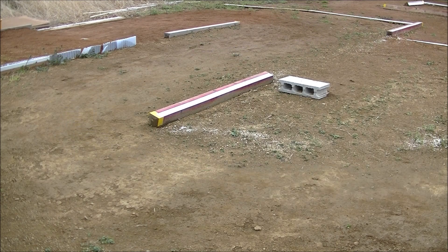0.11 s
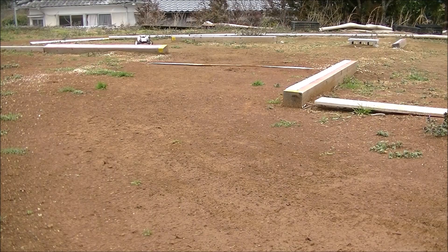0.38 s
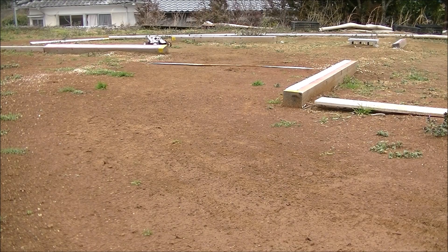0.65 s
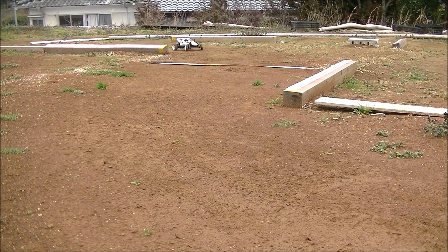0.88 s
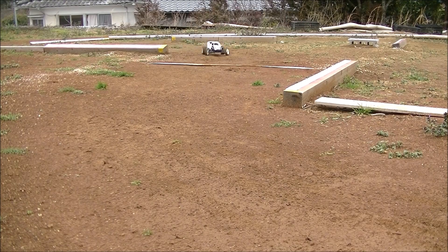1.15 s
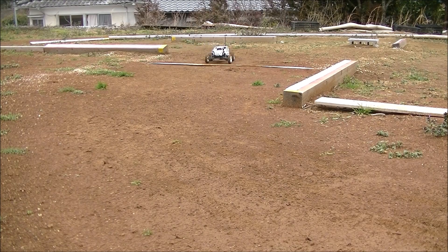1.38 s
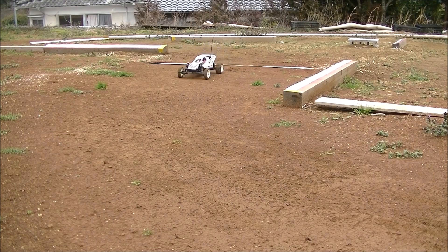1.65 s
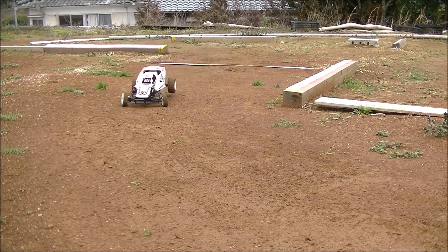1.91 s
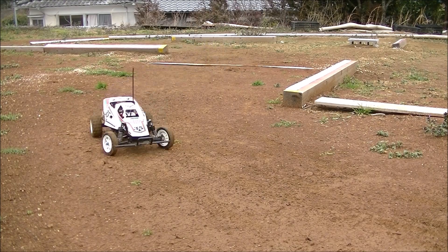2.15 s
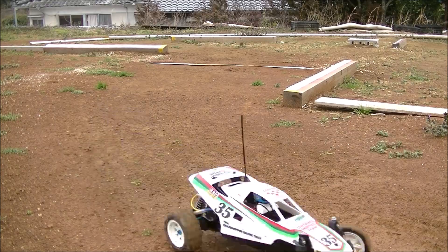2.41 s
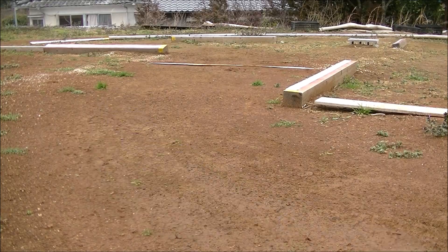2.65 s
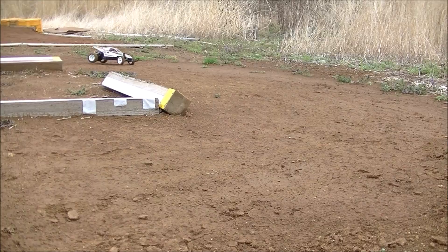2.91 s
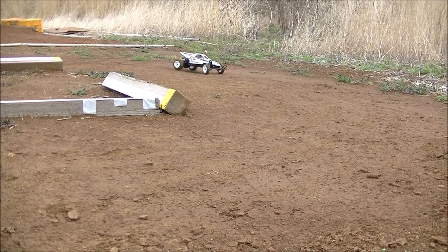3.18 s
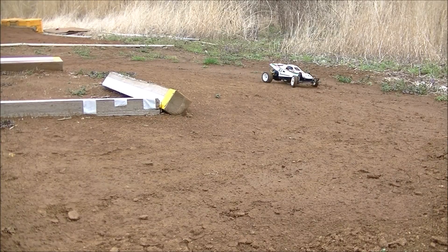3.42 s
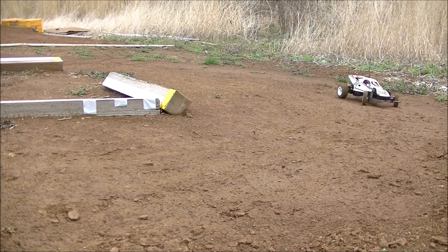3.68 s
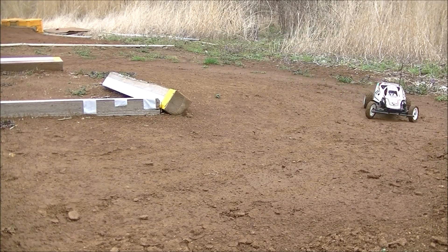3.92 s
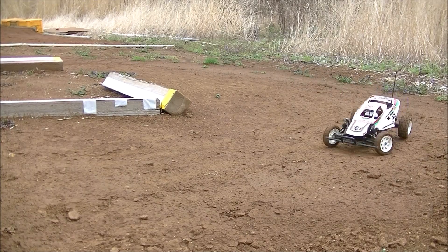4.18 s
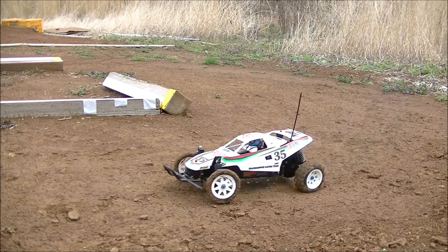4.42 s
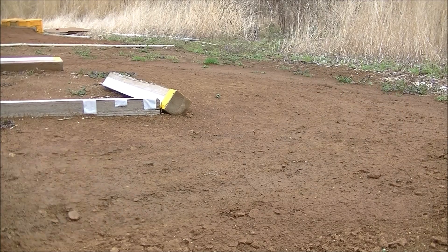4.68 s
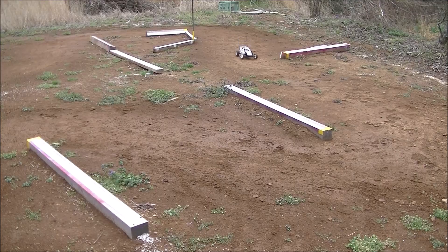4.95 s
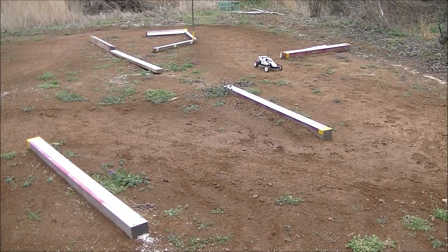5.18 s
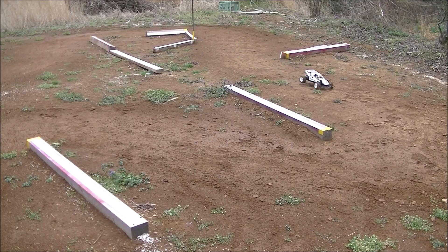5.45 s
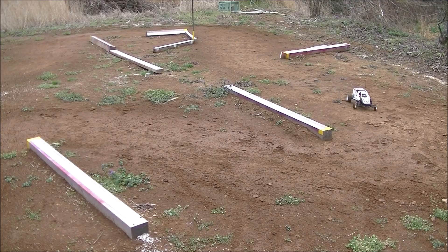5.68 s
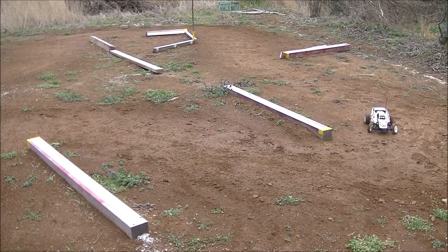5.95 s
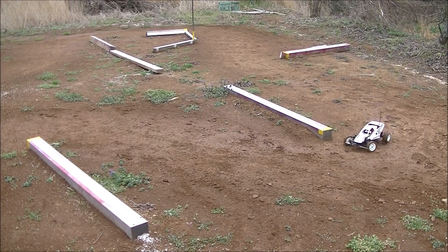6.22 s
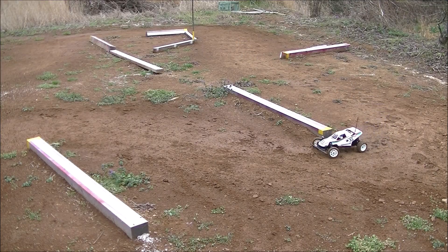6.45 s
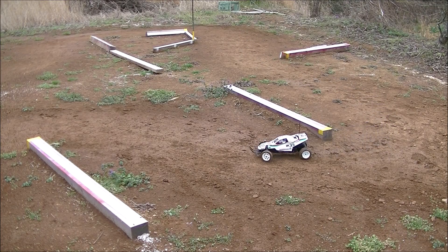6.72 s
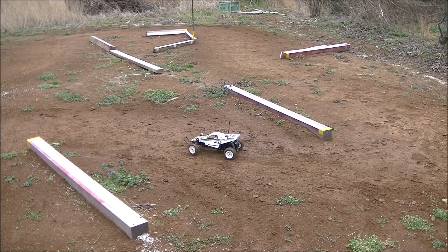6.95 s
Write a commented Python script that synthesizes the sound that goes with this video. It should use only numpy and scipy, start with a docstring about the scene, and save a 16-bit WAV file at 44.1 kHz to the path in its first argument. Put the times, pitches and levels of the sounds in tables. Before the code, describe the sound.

Four hard-cut passes of a toy-sized electric buggy outdoors: raspy gear whine climbing and dropping, grainy tyre scrabble, plastic chassis thuds and ticking stones.

```python
"""On an outdoor dirt track a small electric buggy hops past in four passes joined by hard cuts.
Its gears whine in glides, mostly climbing and then falling quickly: a tooth tone with overtones,
shaped by the gearbox. Tyres scrabble as grainy noise in bands, the plastic chassis thuds and
rattles as struck modes, grit ticks as short ringing snaps, and a few brief tones squeak.
Filtered noise makes a faint rumble, air and two gusts of wind; a sine makes a far drone."""
import sys
import numpy as np
from scipy import signal
from scipy.io import wavfile
from scipy.ndimage import uniform_filter1d

SR = 44100
rng = np.random.default_rng(int(sys.argv[2]) if len(sys.argv) > 2 else 0)


def dump_mix(stems):
    """Bounce the given channels to the path in sys.argv[1] as a 16-bit WAV at rate SR."""
    frames = np.atleast_2d(stems).T  # one column per channel
    limited = np.clip(frames, -1, 1)  # hard clip at full scale
    pcm = np.round(limited * 32767).astype(np.int16)
    wavfile.write(sys.argv[1], SR, pcm)


def gain_from_db(level_db):
    """Convert decibel levels to linear amplitude factors (20 dB per decade)."""
    decades = np.asarray(level_db, float) / 20
    return 10 ** decades


N = 312669

# the four passes: (start [s], end [s])
PASS_SPANS = [(0, .211), (.211, 2.748), (2.748, 4.816), (4.865, 7.1)]
# modes of the plastic chassis: (frequency [Hz], width [Hz], level [dB])
CHASSIS_MODES = [(410, 82, -4.5), (471, 52, -8.5), (685, 144, -4.5), (1125, 270, 6), (1427, 260, 4),
                 (1830, 170, -0.5), (3120, 510, -0.5)]
# resonances of the outer shell: (frequency [Hz], width [Hz], gain [dB])
SHELL_RESONANCES = [(1114, 162, 2), (1670, 170, 1.5), (3430, 210, 3.5), (9140, 1660, 3.5)]


def rms_one(x):
    """Normalisation: scales a signal to unit root mean square."""
    return x / np.sqrt(np.mean(x ** 2) + 1e-20)


def in_time(rows):
    """Linear interpolation: the columns of a table, after its time column, at every sample."""
    s, *columns = np.transpose(rows)
    return np.array([np.interp(np.arange(N) / SR, s, c) for c in columns])


def per_pass(tables):
    """Piecewise control: one table for each pass, jumping at each cut."""
    which = np.searchsorted([end for start, end in PASS_SPANS], np.arange(N) / SR)
    return sum((which == k) * in_time(rows) for k, rows in enumerate(tables))


def constant_per_pass(values):
    """Piecewise control: one steady value for each pass."""
    return per_pass([[(0, value)] for value in values])[0]


def band(x, low_hz, high_hz):
    """Band-pass filtering: keeps the spectrum between two corner frequencies."""
    return signal.sosfilt(signal.butter(2, [low_hz, min(high_hz, .45 * SR)], "band", fs=SR, output="sos"), x)


def drift(rate_hz):
    """Random modulation: noise of spread 1, smoothed by two equal poles at rate_hz."""
    r = np.exp(-40 * np.pi * rate_hz / SR)   # drawn at every 20th sample, then interpolated
    slow = signal.lfilter([1], [1, -2 * r, r * r], rng.standard_normal(N // 20 + 2002))[2000:]
    return np.interp(np.arange(N) / 20, np.arange(len(slow)), rms_one(slow))


def resonance(x, hz, width):
    """Simple resonator: a two-pole filter with gain 1 at its peak."""
    r = np.exp(-np.pi * width / SR)
    poles = [1, -2 * r * np.cos(2 * np.pi * hz / SR), r * r]
    return signal.lfilter((1 - r * r) / 2 * np.array([1, 0, -1]), poles, x + 1e-18)


def coloured(x, peaks):
    """Resonant colouring: raises the spectrum at each resonance in turn."""
    for hz, width, db in peaks:
        x = x + (gain_from_db(db) - 1) * resonance(x, hz, width)
    return x


def mesh():
    """Frequency glides: a short change of tooth rate at each turning point, then a bend to the next."""
    # turning points of the whine:
    # (time [s], tooth rate before [Hz], length of the change [s], tooth rate after [Hz], level [dB])
    turning_points = [(0.0, 3640, 0.039, 2835, -45), (.152, 3804, 0.0073, 3015, -42),
                      (.209, 3050, 0.0039, 2260, -71), (.4, 2264, .06, 2225, -73),
                      (0.527, 2400, 0.03, 2090, -60), (0.574, 2163, .004, 2280, -64),
                      (0.622, 3310, 0.062, 2870, -59.5), (0.701, 3160, 0.035, 2890, -58),
                      (.75, 2920, .06, 2930, -62), (.83, 3000, 0.022, 2930, -68),
                      (1.105, 3185, 0.07, 2135, -80), (1.191, 2104, .01, 2076, -58),
                      (1.235, 2354, .004, 2380, -51), (1.254, 2513, 0.019, 2080, -56),
                      (1.34, 3380, .01, 3417, -51), (1.395, 3670, 0.016, 1942, -49),
                      (1.48, 3480, .01, 3530, -56), (1.529, 3880, 0.026, 2670, -49),
                      (1.665, 3930, 0.028, 2420, -49.5), (1.75, 2924, 0.14, 2230, -55),
                      (2.011, 3080, 0.018, 2780, -42.5), (2.178, 3136, 0.012, 2910, -39.5),
                      (2.194, 2954, 0.014, 2993, -37), (2.234, 3180, 0.015, 2647, -46),
                      (2.252, 2630, .004, 2626, -43.5), (2.289, 3190, 0.012, 3033, -46),
                      (2.355, 3240, 0.032, 2975, -37), (2.455, 3696, 0.029, 2854, -33.5),
                      (2.558, 3670, 0.022, 2820, -32), (2.589, 2909, 0.0037, 2957, -38),
                      (2.66, 3587, .022, 2758, -32), (2.689, 2799, 0.0035, 2850, -38),
                      (2.747, 3426, 0.0038, 2116, -72), (2.81, 2168, 0.042, 2050, -54),
                      (2.884, 2196, .03, 2078, -63), (2.975, 2094, 0.0078, 2080, -49.5),
                      (3.004, 2290, .004, 2306, -46), (3.022, 2400, 0.0059, 2400, -49),
                      (3.036, 2423, 0.04, 2094, -61), (3.092, 2130, .004, 2150, -50.5),
                      (3.143, 2735, 0.025, 2300, -54), (3.172, 2300, 0.0077, 2343, -48.5),
                      (3.198, 2626, .004, 2648, -50), (3.222, 3000, 0.024, 2693, -55.5),
                      (3.252, 2690, .008, 2713, -55), (3.285, 3080, 0.0058, 3090, -56),
                      (3.325, 3347, 0.012, 2475, -51), (3.35, 2480, 0.034, 2155, -52),
                      (3.452, 2754, 0.026, 2086, -54.5), (3.6, 2008, .11, 1937, -58.5),
                      (3.9, 2450, 0.0086, 2470, -52), (3.974, 2980, 0.022, 2503, -54),
                      (4.05, 2243, .006, 2280, -48), (4.064, 2490, 0.026, 2374, -45),
                      (4.104, 2420, .004, 2450, -57), (4.125, 3017, 0.008, 2438, -49),
                      (4.136, 2440, 0.012, 2560, -40.5), (4.16, 2900, .004, 2950, -51),
                      (4.194, 3510, 0.029, 2050, -43), (4.228, 2094, 0.0037, 2140, -44),
                      (4.25, 2643, 0.0047, 2706, -44), (4.268, 3060, 0.0059, 3084, -44),
                      (4.327, 3826, 0.028, 2540, -44.5), (4.44, 3700, .02, 3844, -43),
                      (4.472, 3880, 0.026, 2547, -36), (4.514, 2563, .004, 2608, -43),
                      (4.574, 3543, 0.017, 3610, -39.5), (4.597, 3637, 0.018, 2834, -40.5),
                      (4.625, 2775, .008, 2780, -40), (4.697, 3600, 0.018, 2873, -40),
                      (4.757, 3506, .02, 3344, -43.5), (4.798, 3810, 0.015, 3194, -36),
                      (4.859, 2880, 0.12, 2404, -65.5), (5.0, 2446, 0.026, 2324, -62.5),
                      (5.086, 2417, 0.052, 2352, -59.5), (5.187, 2913, 0.017, 2455, -59),
                      (5.245, 3260, 0.0041, 3215, -53), (5.292, 3836, 0.019, 2683, -56.5),
                      (5.437, 3710, 0.017, 2207, -56.5), (5.5, 2122, 0.013, 2085, -60.5),
                      (5.56, 2268, 0.016, 2238, -83), (6.39, 2346, 0.043, 2470, -88),
                      (6.575, 2930, 0.021, 2870, -60), (6.608, 2953, 0.017, 2884, -54.5),
                      (6.63, 2874, 0.0097, 2888, -70), (6.665, 2983, 0.021, 2196, -67),
                      (6.69, 2304, 0.0079, 2352, -60), (6.75, 2890, 0.017, 2860, -52),
                      (6.78, 2800, 0.023, 2774, -66), (6.81, 2847, 0.0042, 2950, -57),
                      (6.833, 3220, 0.019, 2715, -62), (6.91, 2810, 0.0058, 2825, -56),
                      (6.95, 3105, 0.025, 2795, -62), (6.982, 2817, .012, 2795, -56),
                      (7.002, 3540, 0.026, 2130, -55), (7.03, 2130, 0.0064, 2176, -52),
                      (7.056, 2800, 0.0056, 2850, -57), (7.09, 3430, 0.028, 2810, -47)]
    glide_bend = 1.5      # each glide moves fast at first, then levels off (1 = straight)
    change_beading = .45  # share of the beading left during each change
    change_db = -4.5      # the whine swells through each change from this far down
    sink_db_per_s, sink_s = -90, .075   # the whine sinks as each glide begins, for at most this long
    s, before, length, after, db = np.transpose(turning_points)
    t = np.arange(N) / SR
    k = np.clip(np.searchsorted(s, t, "right") - 1, 0, len(s) - 2)
    glide_start = s[k] + length[k]
    changing = t < glide_start

    glided = np.clip((t - glide_start) / np.maximum(s[k + 1] - glide_start, 1e-4), 0, 1)
    glide_hz = after[k] + (before[k + 1] - after[k]) * (1 - (1 - glided) ** glide_bend)
    change_hz = before[k] + (after[k] - before[k]) * np.clip((t - s[k]) / length[k], 0, 1)
    teeth_hz = np.where(changing, change_hz, glide_hz)

    beading = uniform_filter1d(np.where(changing, change_beading, 1.), int(.004 * SR))

    whine_db = db[k] + (db[k + 1] - db[k]) * glided ** 2.0
    whine_db = whine_db + sink_db_per_s * np.clip(t - glide_start, 0, sink_s)
    whine_db = whine_db + change_db * np.clip((glide_start - t) / length[k], 0, 1)
    return teeth_hz, beading, whine_db


def gears(teeth_hz, whine_db, beading, turn):
    """Gear-mesh tones: an uneven gear bites once a turn, so tooth tone and overtones come in raspy beads."""
    # multiples 1 to 5 of the tooth rate: (level [dB])
    overtones_db = [12.5, 11.5, 2.5, -12, -29]
    # gearbox resonances: (frequency [Hz], width [Hz], gain [dB])
    housing = [(2400, 470, 2), (3600, 700, 1.5), (5970, 390, 5), (7000, 1300, 0)]
    # balance of the whine: (time [s], overtones over the tooth tone [dB])
    balance = [(0, 2), (.2, -4), (.55, -4), (.7, -8), (1.0, -8), (1.25, 4), (1.36, 0), (1.4, 5), (1.45, 1),
               (1.68, -2), (1.8, -12), (2.2, 1), (2.46, -0.5), (2.53, -6), (2.56, 6), (2.58, 2), (2.6, -3),
               (2.645, -8), (2.665, 4), (2.76, -7), (2.93, -8), (2.99, -1), (3.2, 3), (3.3, 3), (3.45, -17),
               (3.75, -3), (4.0, 1.5), (4.44, 7), (4.49, 1), (4.58, 7), (4.7, 3), (4.76, 2), (4.81, -8),
               (5.0, -2), (5.245, 2), (5.28, -16), (5.33, 4), (5.4, -4), (5.5, -12.5), (6.4, -3), (6.6, 8),
               (7.1, 7)]
    rasp = .44       # share of each tone that is smeared
    break_db = 2.2   # the whine comes and goes with the play in the gears
    balance_db, = in_time(balance)
    roughness = .012 * drift(800) + 0.00572 * drift(41.8)
    phase = 2 * np.pi * np.cumsum(teeth_hz * (1 + roughness)) / SR
    out = 0
    for k, db in enumerate(overtones_db):
        bead = np.exp(beading * (np.cos(turn + .9 * drift(5)) - 1))   # shallower beads join up
        tilt_db = balance_db * (.5 if k else -.5)
        # uneven teeth smear each overtone into a narrow band of noise
        in_phase = (1 - rasp + rasp * drift(107)) * np.sin((k + 1) * phase)
        quadrature = rasp * drift(144) * np.cos((k + 1) * phase)
        out = out + gain_from_db(db + tilt_db + break_db * drift(22)) * bead * (in_phase + quadrature)
    return gain_from_db(whine_db) * coloured(out, housing)


def scrabble(level_db, growl_db, bright_db, turn):
    """Granular friction noise: tyre lugs tear dirt, as grains and hiss in bands that flicker together."""
    # spectrum of the torn dirt: (frequency [Hz], relative level [dB])
    dirt_colour = np.array([(120, -55), (200, -21), (463, -4), (944, -3), (1110, -2.5), (1920, 1),
                            (3390, -19), (4970, -2.5), (6310, 4.5), (7710, -7), (10700, -8.5), (13600, -28),
                            (15700, -78)])
    # each pass: (the tyres' lowest sound under their growl [dB])
    weight_levels = [-10.5, -6, -10.5, -12.5]
    # each pass: (gain of the upper third of the growl [dB])
    growl_tops = [-8, -0.5, 0, -4.5]
    top_db = constant_per_pass(growl_tops)
    weight_db = growl_db + constant_per_pass(weight_levels)

    grain_on = rng.random((2, N)) < 1500 / SR   # grains per second
    grain_size = gain_from_db(3.3 * np.minimum(rng.exponential(1, (2, N)), 5))
    grains = grain_on * grain_size * rng.choice([-1, 1], (2, N))
    source = 1.18 * rng.standard_normal((2, N)) + 0.41 * rms_one(grains)

    edges = 200 * 2 ** np.arange(0, 6.6, .5)   # half octaves
    together_db = .4 * drift(15) + 1.8 * drift(70) + 1.2 * np.cos(turn)
    spray_db = 0.48 * drift(200)   # thrown dirt comes in spurts that are mostly treble
    groups = np.zeros((4, N))
    for k, (low_hz, high_hz) in enumerate(zip(edges, edges[1:])):
        colour_db = np.interp(np.log(low_hz * high_hz) / 2, np.log(dirt_colour[:, 0]), dirt_colour[:, 1])
        group = int(low_hz > 790) + int(low_hz > 2200) + int(low_hz > 4400)
        band_db = colour_db + 1.62 * drift(9.4) + spray_db * (group == 3) + top_db * (k == 6)
        groups[group] += gain_from_db(band_db) * band(source[k % 2], low_hz, high_hz)
    low, growl, mid, top = [rms_one(g) for g in groups]
    mix = gain_from_db(level_db) * mid + gain_from_db(growl_db) * growl + gain_from_db(weight_db) * low + gain_from_db(bright_db) * top
    return gain_from_db(together_db - 3.5) * coloured(mix, SHELL_RESONANCES)


def bumps():
    """Forced modal vibration: each landing shakes the chassis modes, low ones as thud, high as crunch."""
    # landings and bumps: (time [s], relative thud [dB], relative crunch [dB], half duration [s])
    landings = [(0.012, -25.5, -17, 0.022), (0.035, -37, -19, 0.036), (0.154, -26.5, -22, 0.029),
                (0.17, -60, -23.5, 0.061), (0.427, -44, -47.5, 0.09), (0.45, -60, -52, 0.0099),
                (0.508, -53, -41, 0.023), (0.529, -46, -41.5, 0.055), (0.641, -40.5, -49, 0.064),
                (0.705, -41, -43, 0.12), (0.917, -36, -30, 0.04), (0.994, -56, -40, 0.0045),
                (1.021, -62, -37, 0.037), (1.259, -34, -27, 0.02), (1.383, -34, -33, 0.07),
                (1.53, -31.5, -31, 0.032), (1.661, -27.5, -34, 0.044), (1.798, -34, -37, 0.041),
                (1.859, -35.5, -59, 0.039), (1.951, -42, -32, 0.081), (2.008, -31, -29, 0.072),
                (2.065, -38, -23.5, 0.024), (2.169, -27.5, -24, 0.053), (2.322, -28, -26.5, 0.093),
                (2.455, -24.5, -17.5, 0.052), (2.557, -27, -18, 0.021), (2.566, -29, -15, 0.031),
                (2.658, -25.5, -18.5, 0.043), (2.705, -40, -19.5, 0.041), (3.155, -36, -32.5, 0.04),
                (3.221, -42, -45, 0.034), (3.317, -38, -29, 0.051), (3.471, -39, -32, 0.027),
                (3.558, -47.5, -33.5, 0.12), (4.076, -41, -26.5, 0.073), (4.192, -29.5, -27, 0.044),
                (4.328, -26, -16.5, 0.042), (4.473, -26, -18, 0.031), (4.592, -21.5, -21, 0.036),
                (4.698, -20, -16, 0.025), (4.794, -16.5, -21.5, 0.085), (5.187, -43, -42, 0.04),
                (5.289, -37, -31, 0.054), (5.439, -38, -33, 0.033), (5.576, -39.5, -32.5, 0.04),
                (5.61, -56, -44, 0.031), (5.649, -66, -37, 0.021), (5.692, -71, -33, 0.017),
                (6.039, -56, -36, 0.014), (6.352, -67, -33.5, 0.014), (6.414, -68, -36.5, 0.039),
                (6.49, -70, -36.5, 0.041), (6.634, -63, -32, 0.038), (6.765, -65, -29, 0.033),
                (6.883, -64, -27, 0.022), (6.953, -62, -32, 0.022), (6.991, -60, -26, 0.051)]
    thud, crunch = np.zeros(N), np.zeros(N)
    for s, thud_db, crunch_db, length in landings:
        t = np.arange(int(2 * length * SR)) / (SR * length)   # in half durations
        shape = 2.95 * t * np.exp(-3.0 * t) * (1 - t / 2)
        cut = min(end for start, end in PASS_SPANS if end > s)
        shape = shape * (s + t * length < cut)   # lasts no longer than the pass
        i = max(int((s - .004) * SR), 0)
        thud[i:i + len(t)] += (gain_from_db(thud_db) * shape)[:N - i]
        crunch[i:i + len(t)] += (gain_from_db(crunch_db) * shape)[:N - i]
    shake = rng.standard_normal((len(CHASSIS_MODES), N)) * gain_from_db(1.94 * drift(340))
    rings = [gain_from_db(db) * rms_one(resonance(n, hz, width)) for n, (hz, width, db) in zip(shake, CHASSIS_MODES)]
    dirt = gain_from_db(8.0) * rms_one(band(shake[0], 1180, 7500))
    return thud * rms_one(sum(rings[:3])) + crunch * rms_one(sum(rings[3:]) + dirt)


def rattle(growl_db):
    """Impulse excitation: loose plastic parts knock at random, each knock ringing one chassis mode."""
    knocks_per_s, under_growl_db = 200, -5
    width_share = .5   # of the chassis widths: narrower, so a longer ring
    knock_on = rng.random(N) < knocks_per_s / SR
    knock_size = gain_from_db(3.7 * np.minimum(rng.exponential(1, N), 3))
    knocks = knock_on * knock_size * rng.choice([-1, 1], N)
    modes = CHASSIS_MODES[1:6]
    dealt = rng.integers(0, len(modes), N)
    rings = 0
    for k, (hz, width, db) in enumerate(modes):
        rings = rings + gain_from_db(db) * rms_one(resonance(knocks * (dealt == k), hz, width_share * width))
    return gain_from_db(growl_db + under_growl_db) * rms_one(rings)


def grit(level_db):
    """Impact radiation: stones on the shell give a pitched crack and a duller body; small ones are random."""
    # stones striking the shell: (time [s], crack peak before filtering [dB], centre of the crack [Hz])
    stones = [(0.0293, -6, 4800), (0.115, -9.5, 4580), (0.152, -14, 3050), (0.5062, -40, 2790),
              (.686, -33, 7780), (.815, -27, 6000), (.9, -41, 7100), (.987, -36, 2500), (1.02, -44, 8500),
              (1.079, -26.5, 7000), (1.133, -33, 8060), (1.1435, -23, 6470), (1.18, -27, 7500),
              (1.204, -24.5, 4065), (1.258, -27, 7000), (1.38, -24, 7990), (1.394, -21, 2530),
              (1.406, -22, 2400), (1.6095, -32, 3740), (1.674, -17, 2793), (1.7044, -38, 2822),
              (1.873, -20, 2927), (1.955, -13.5, 2505), (1.9773, -17, 2720), (2.0132, -19, 5650),
              (2.0524, -13.5, 2570), (2.1113, -15, 6040), (2.1888, -13, 5780), (2.2798, -26, 6326),
              (2.3425, -9.5, 2900), (2.4155, -17, 4050), (2.4402, -9, 5960), (2.476, -26, 5880),
              (2.5668, -22, 6484), (2.5776, -4.5, 2750), (2.7095, -8, 2920), (3.4632, -25, 7770),
              (3.688, -22, 2780), (3.9678, -27, 3193), (4.0952, -25, 3355), (4.204, -19, 4910),
              (4.33, -10, 3294), (4.4215, -11, 3403), (4.4765, -9, 2735), (4.5676, -12, 7360),
              (4.6681, -3, 5080), (4.7036, -26, 3260), (4.741, -11, 3237), (4.8027, -21, 3252),
              (4.944, -43, 2675), (4.9614, -27.5, 4850), (5.1879, -40, 2540), (5.2997, -29, 2740),
              (5.3253, -22, 6030), (5.444, -35, 3550), (5.5757, -20.5, 8340), (5.617, -23.5, 5840),
              (5.6482, -28, 3730), (5.882, -39, 3430), (5.937, -25.5, 6420), (5.948, -28, 7000),
              (6.022, -27, 7600), (6.0426, -31, 3530), (6.088, -36, 5160), (6.102, -26.5, 6270),
              (6.133, -29, 6600), (6.35, -26, 5940), (6.384, -34, 3500), (6.418, -45, 4980),
              (6.5664, -24, 6490), (6.643, -34, 4480), (6.8863, -29, 5800), (6.9, -16.5, 6100)]
    first_touch = 3.0   # the stone's first contact, in spreads of the rattle after it
    body_db = -18.5     # the shell's duller answer under each crack
    crack_width = 0.14  # width of a crack's ring as a share of its centre
    bright, body = np.zeros(N), np.zeros(N)
    t = np.arange(int(0.0052 * SR)) / SR
    snaps = rng.standard_normal((len(stones), len(t))) * (1 - np.exp(-t / .0001)) * np.exp(-t / .0012)
    snaps[:, 2] += first_touch
    for (s, db, hz), snap in zip(stones, snaps):
        i = int(s * SR)
        crack = rms_one(resonance(snap, hz, crack_width * hz)) + rms_one(snap)   # ring and broad snap
        bright[i:i + len(t)] += (gain_from_db(db) * crack / np.abs(crack).max())[:N - i]
        body[i:i + len(t)] += (gain_from_db(db + body_db) * snap)[:N - i]

    small_on = rng.random(N) < 80 * gain_from_db(5.0 * drift(4)) / SR   # the rate wanders about 80 per second
    small = small_on * gain_from_db(4.67 * np.minimum(rng.exponential(1, N), 2.2))
    small = signal.lfilter([1], [1, -np.exp(-1 / (.002 * SR))], small) * rng.standard_normal(N)   # 2 ms decay
    small = gain_from_db(level_db - 5.0) * small
    dull = band(small, 3300, 11000) + band(body, 1200, 3800)
    return band(bright, 2000, 14000) + coloured(dull, SHELL_RESONANCES)


def squeaks():
    """Frequency modulation: brief sine tones whose pitch wavers at random."""
    # short squeaks: (start [s], length [s], mean frequency [Hz], level [dB])
    tones = [(0.207, 0.042, 3550, -49), (0.454, 0.016, 1760, -45.5), (1.02, 0.068, 3430, -52),
             (3.986, 0.047, 1705, -34)]
    out, t, waver = np.zeros(N), np.arange(N) / SR, drift(45.2)
    for s, length, hz, db in tones:
        shape = np.sin(np.pi * np.clip((t - s) / length, 0, 1)) ** .5
        out += gain_from_db(db) * shape * np.sin(2 * np.pi * np.cumsum(hz * (1 + 0.083 * waver)) / SR)
    return out


def ground_reflection(buggy):
    """Comb interference: a ground echo, inverted at grazing angle, for each pass; also the gate of the passes."""
    # each pass: (echo delay at start [ms], echo delay at end [ms], echo share [0-1])
    ground = [(.39, .39, .1), (.24, .36, .3), (.28, .3, .1), (.14, .14, .4)]
    t, out, gate = np.arange(N) / SR, 0, 0
    for (start, end), (first_ms, last_ms, share) in zip(PASS_SPANS, ground):
        echo_ms = np.interp(t, [start, end], [first_ms, last_ms])
        on = (t >= start) & (t < end)
        out = out + on * (buggy - share * np.interp(t - echo_ms / 1000, t, buggy))
        gate = gate + on
    return out, gate


def port_difference(buggy, level_db):
    """Interaural level difference: half the left-right difference, by bearing and frequency band."""
    # where the buggy is across the view: (time [s], bearing [about -1 right to 1 left])
    bearing = [(0, -0.6), (.2, -1), (.22, -0.062), (.5, 0.49), (1.34, -0.13), (2.25, 0.19), (2.5, -0.26),
               (2.745, -1.28), (2.76, 0.78), (3.15, 0.47), (3.5, -0.51), (3.94, -0.91), (4.5, -0.27),
               (4.82, 1), (4.87, 0.25), (5.3, -0.2), (5.9, -1.13), (6.4, -0.93), (7.1, 0.071)]
    near_db, near_follows = -25, 0.7   # the overall lean widens with nearness: full at [dB], [dB per dB]
    bias_3k, bias_7k = 0.5, 0.54       # standing lean with the buggy straight ahead [bearing units]
    left, = in_time(bearing)
    overall = 0.12 * left * gain_from_db(near_follows * (level_db - near_db)) * buggy
    treble = 0.018 * left * band(buggy, 5500, 16000)
    near_3k = -0.11 * (bias_3k - left) * band(buggy, 2560, 4200)
    near_7k = 0.12 * (bias_7k + left) * band(buggy, 3800, 8900)
    return overall + treble + near_3k + near_7k - 0.1 * band(buggy, 300, 800)


def barrier_echoes(buggy):
    """Discrete reflection: faint echoes off the barriers, with different delays at left and right."""
    sides = []
    for lag in (.013, .019):   # seconds, left and right
        low = gain_from_db(-29.5) * band(np.roll(buggy, int(lag * SR)), 330, 2200)
        high = gain_from_db(-21.5) * band(np.roll(buggy, int(lag * SR / 4)), 3600, 8800)
        sides.append(low + high)
    return np.array(sides)


def gusts():
    """Wind turbulence: lumpy low noise, partly separate at each port, coming on within 10 ms."""
    # wind buffeting the ports: (start [s], end [s], level [dB])
    spells = [(0, 0.217, -61.5), (6.696, 7.1, -63.5)]
    t = np.arange(N) / SR
    on = sum(gain_from_db(db) * np.clip((t - start) / .01, 0, 1) * (t < end) for start, end, db in spells)
    mid, side = band(band(rng.standard_normal((2, N)), 79, 177), 88, 310)
    return on * gain_from_db(2.5 * drift(24)) * rms_one(mid + 1.2 * side * [[1], [-1]])


def outdoors():
    """Partial coherence: distant rumble and air at the ports, partly separate per side, and a far drone."""
    # wind and far rumble, one table a pass: (time [s], level [dB])
    far_rumble = [
        [(0, -73), (0.2, -58)],
        [(0.23, -68), (1.77, -67.5), (2.25, -59), (2.74, -64)],
        [(2.77, -68.5), (3.7, -69), (4.3, -64), (4.7, -66), (4.8, -84)],
        [(4.88, -88), (5.4, -77.5), (6.5, -82.5), (7.09, -76)],
    ]
    # moving air at the ports, each pass: (level [dB])
    air_levels = [-67, -88, -95, -84.5]
    # far drone: (time [s], level [dB])
    drone_levels = [(0, -70), (.9, -77), (1.4, -70), (1.8, -65), (2.5, -67.5), (2.74, -65), (2.76, -100),
                    (7.1, -100)]
    drone_hz = 86.1
    rumble_db, = per_pass(far_rumble)
    mid, side = band(rng.standard_normal((2, N)), 117, 239)
    rumble = gain_from_db(rumble_db + 1.5 * drift(8)) * rms_one(mid + .42 * side * [[1], [-1]])
    mid, side = band(rng.standard_normal((2, N)), 30, 90)
    air_gain = gain_from_db(constant_per_pass(air_levels)) + gain_from_db(rumble_db - 20)
    air = air_gain * rms_one(mid + 0.4 * side * [[1], [-1]])
    drone = np.sin(2 * np.pi * drone_hz * np.arange(N) / SR + 0.32 * drift(1.5))
    return rumble + air + gain_from_db(in_time(drone_levels)[0]) * drone


def scene():
    """Superposition: the buggy before two close microphone ports, with faint echoes and outdoor noise."""
    # rolling, one table a pass; loudness follows nearness, dig deepens the tyres, wheelspin throws dirt:
    # (time [s], loudness [dB], dig [dB], wheelspin [dB])
    rolling = [
        [(0.0, -35, 1.5, 4), (0.056, -41, -4, 3.5), (0.174, -32.5, -9, -0.5), (0.2, -35, -8, -3)],
        [(0.23, -56, -3, -7), (0.48, -56, 0.5, -11), (0.65, -49.5, -2.5, -7), (0.82, -44, -3, -11),
         (0.98, -47, -1.5, -10), (1.11, -46.5, -2, -2.5), (1.3, -45, -3, -6), (1.53, -40.5, -6.5, -5.5),
         (1.9, -46, -0.5, -2), (2.2, -37.5, -1, -1.5), (2.38, -31.5, -5, -2.5), (2.56, -26.5, -6, -3),
         (2.7, -26.5, -7.5, -10), (2.74, -31, -7.5, -4.5)],
        [(2.77, -46.5, 1, -6), (3.06, -48.5, 1.5, 0.5), (3.46, -40.5, -3.5, -5), (3.69, -45.5, -5, -13),
         (3.93, -42.5, -3, -7.5), (4.1, -39.5, -5.5, -5), (4.23, -37, -4.5, -4.5), (4.39, -35, -1.5, -1.5),
         (4.58, -35, 2.5, 4.5), (4.63, -36.5, 6, 1), (4.68, -37.5, -2, 4), (4.71, -30, -1.5, -7),
         (4.78, -31, -3.5, -3), (4.8, -30.5, -2, -7)],
        [(4.88, -55, 6, 3), (5.2, -53.5, 1.5, 2.5), (5.38, -46.5, -3, -1.5), (5.48, -52, 2.5, 2),
         (5.66, -51.5, 8.5, 2), (5.79, -54, 9.5, 2.5), (5.92, -52, 6, 2), (6.05, -53.5, 10, 6),
         (6.08, -53, 4.5, -2), (6.22, -56.5, 2, 0), (6.38, -56.5, 5.5, 1), (6.64, -55, 9, 4), (6.74, -54, 8, 4),
         (6.95, -45, 7, 1.5), (7.09, -51.5, 8.5, 10.5)],
    ]
    teeth_per_turn = 55.0
    level_db, dig_db, spin_db = per_pass(rolling)
    growl_db = level_db + dig_db
    teeth_hz, beading, whine_db = mesh()
    turn = 2 * np.pi * np.cumsum(teeth_hz / teeth_per_turn) / SR   # angle of the gear [rad]
    buggy = gears(teeth_hz, whine_db, beading, turn)
    buggy = buggy + scrabble(level_db, growl_db, level_db + spin_db, turn)
    buggy = buggy + bumps() + rattle(growl_db) + grit(level_db) + squeaks()
    buggy, gate = ground_reflection(buggy)
    buggy = band(buggy, 120, 19000)
    difference = port_difference(buggy, level_db)
    stereo = buggy + difference * [[1], [-1]]
    return gate * (stereo + barrier_echoes(buggy) + gusts() + outdoors())   # silence outside the passes


def roll_off(x):
    """The treble ends steeply here."""
    return signal.sosfilt(signal.butter(12, 15860, fs=SR, output="sos"), x)


def record(dry):
    """Band limiting: a steep low-pass takes 60 dB off everything above 16150 Hz."""
    finished = signal.sosfilt(signal.cheby2(12, 60, 16150, fs=SR, output="sos"), dry)
    return roll_off(finished)


dry = scene()
out = record(dry)
dump_mix(out)
```